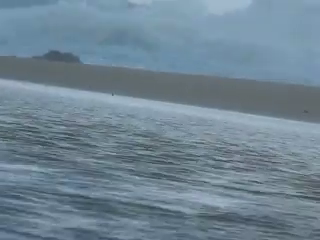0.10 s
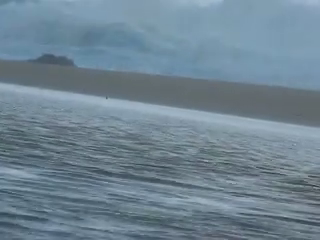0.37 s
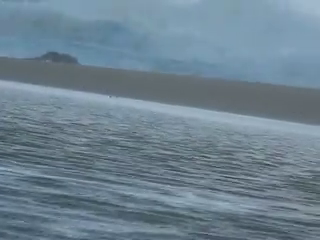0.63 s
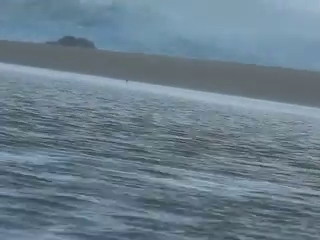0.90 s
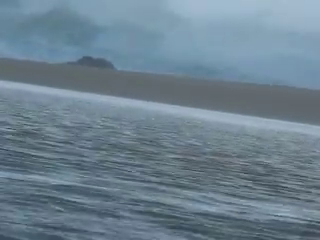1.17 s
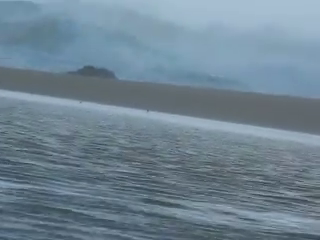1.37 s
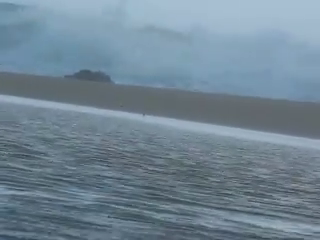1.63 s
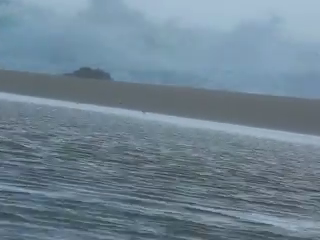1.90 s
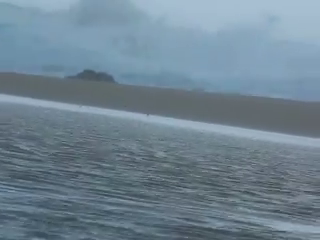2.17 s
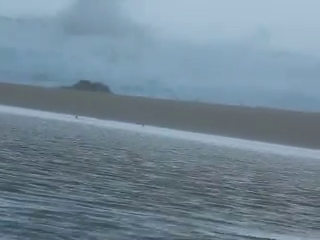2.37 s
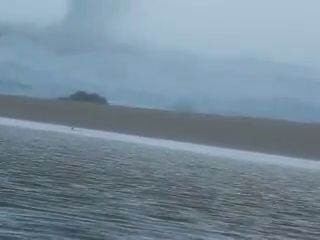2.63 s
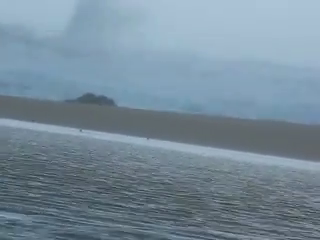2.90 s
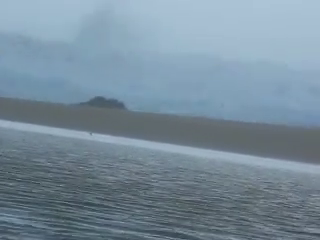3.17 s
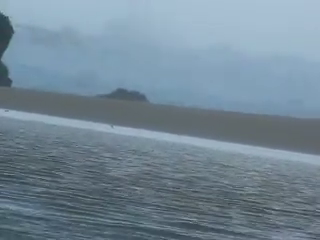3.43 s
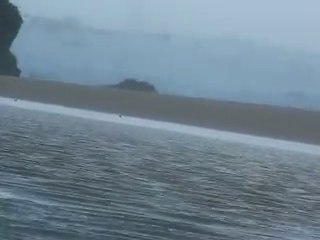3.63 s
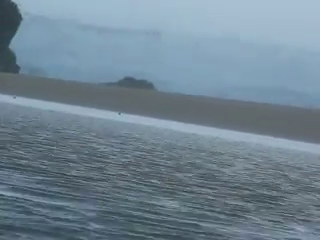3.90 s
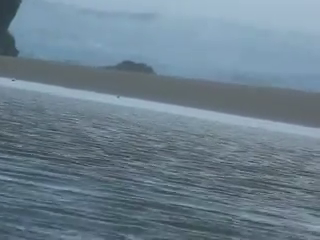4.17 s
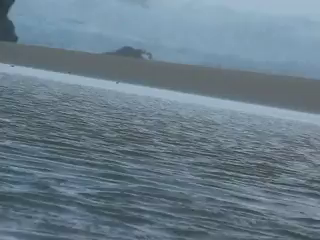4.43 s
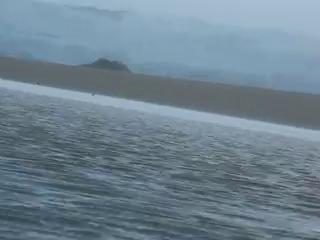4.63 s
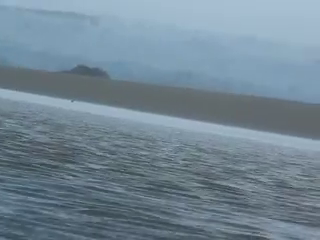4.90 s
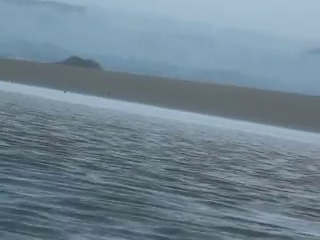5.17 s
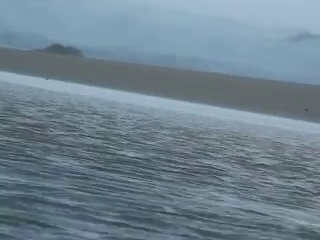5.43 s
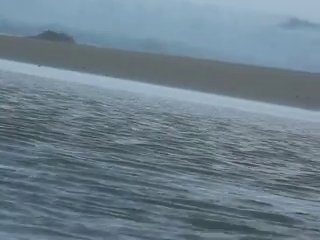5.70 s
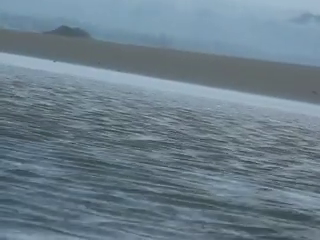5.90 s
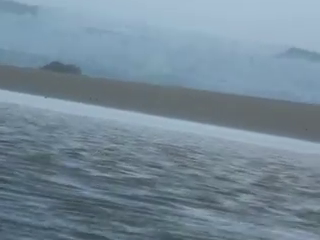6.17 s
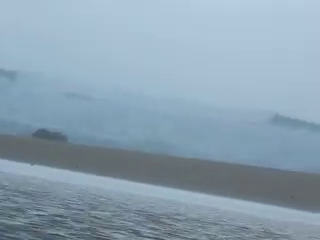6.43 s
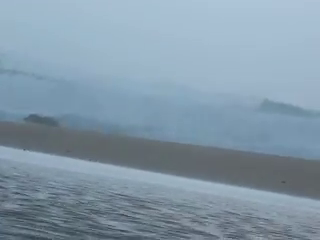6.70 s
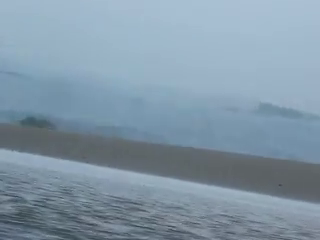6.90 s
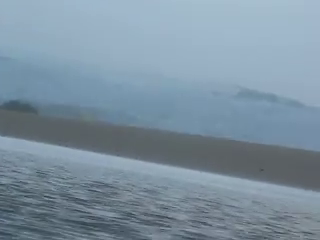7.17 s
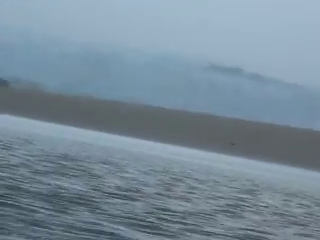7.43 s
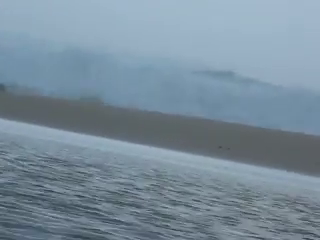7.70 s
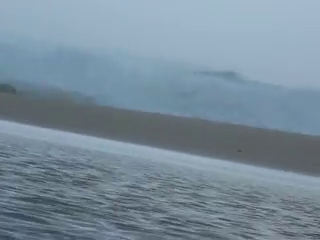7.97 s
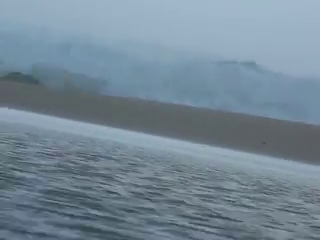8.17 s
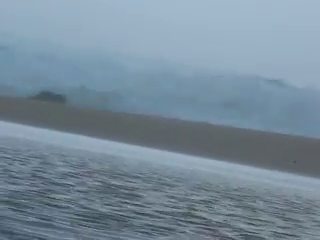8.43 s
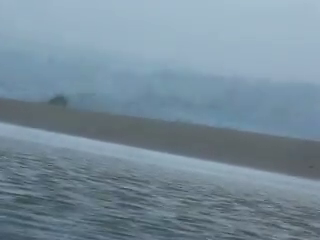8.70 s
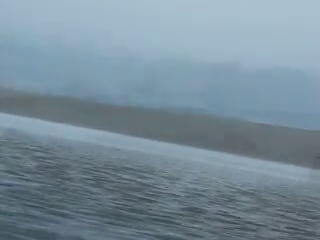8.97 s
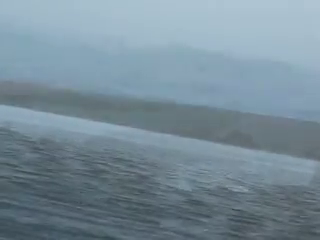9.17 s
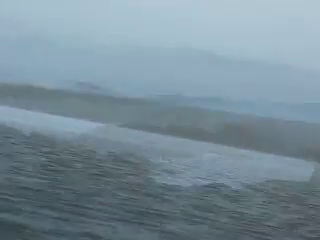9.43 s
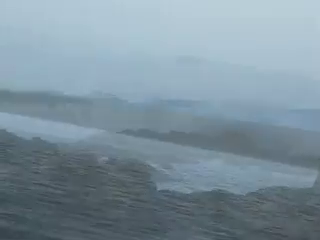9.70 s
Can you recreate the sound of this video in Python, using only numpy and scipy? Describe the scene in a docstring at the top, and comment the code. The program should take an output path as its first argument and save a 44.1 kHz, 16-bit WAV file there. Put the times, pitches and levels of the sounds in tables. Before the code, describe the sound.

On an exposed stormy shore, heavy surf roars continuously some way off, a wide blurred wash of low roar and soft hiss without distinct breaking waves. Close up, wind tears across a stereo microphone in deep, ragged thumps with duller fluttering flaps on top, the two sides moving independently. Hard hits on the left come at 0.6-0.7 s, then the right takes several between 0.8 and 1.6 s. From about 2 s the left is battered almost constantly, with especially violent, clipped blows near 2.7, 3.1, 4.2, 4.9, 6.4 and 7.1 s; the whole sound dips briefly after the worst. Short lulls around 7.4 and 8 s let the surf through more clearly, its hiss strongest near 8.2 s. Another thud lands there, with lesser buffets until 9 s. The left then eases, leaving lighter rumble, a small flap on the right at 9.3 s, and continuing surf to the end at 9.8 s.

```python
"""Storm surf and wind on two microphone ports

Heavy surf roars some way off on an open coast: banded noise, shaded and delayed by a slowly turning housing;
its level as heard creeps up and falls back after hard buffets, along a set curve.
Close by, gusts tear across the ports: low noise thumps on each port on its own, the left mostly the harder hit,
with brighter flaps on top. A limiter briefly pulls the whole sound down after the hardest buffets,
and peaks that still exceed full scale are clipped."""
import sys
import numpy as np
from scipy import signal
from scipy.fft import rfft, irfft, next_fast_len
from scipy.io import wavfile
from scipy.ndimage import uniform_filter1d

SR = 44100
rng = np.random.default_rng(int(sys.argv[2]) if len(sys.argv) > 2 else 0)


def waveform_to_disk(signal):
    """Save audio, clipped to [-1, 1], as 16-bit WAV at the path in sys.argv[1]."""
    frames = np.transpose(np.atleast_2d(signal))
    scaled = np.clip(frames, -1, 1) * 32767
    samples = np.round(scaled).astype(np.int16)
    wavfile.write(sys.argv[1], SR, samples)


def gain_from_db(level_db):
    """Convert decibel levels to linear amplitude factors (20 dB per decade)."""
    decades = np.asarray(level_db, float) / 20
    return 10 ** decades


N = 433503

# slow turn of the microphone housing: (time [s], share of the turn [0-1])
TURN = [(0, 0.12), (1.5, 0.1), (3.5, 0.54), (6.5, 0.86), (9.83, 1)]


def rms_one(x):
    """Scale each channel to rms 1."""
    return x / np.sqrt(np.mean(x ** 2, axis=-1, keepdims=True) + 1e-20)


def in_time(rows):
    """Columns of a curve table, one value a sample."""
    seconds, *columns = np.transpose(rows)
    return np.array([np.interp(np.arange(N) / SR, seconds, column) for column in columns])


def at_hz(points, hz):
    """Read a spectrum on a log-frequency axis."""
    point_hz, value = np.transpose(points)
    return np.interp(np.log(hz + 1e-3), np.log(point_hz), value)


def coloured(x, gain_db_at):
    """Filter by a smooth gain given in dB as a function of frequency."""
    size = next_fast_len(N)
    hz = np.arange(size // 2 + 1) * SR / size
    return irfft(rfft(x, size) * gain_from_db(gain_db_at(hz)), size)[..., :N]


def drift(corner_hz, channels=1):
    """Slow chance of spread 1: coarse noise through a double one-pole low-pass."""
    step, settle = 40, 2000   # samples between coarse points, coarse points dropped at the start
    pole = np.exp(-2 * np.pi * corner_hz * step / SR)
    coarse = rng.standard_normal((channels, N // step + settle + 2))
    slow = rms_one(signal.lfilter([1], [1, -2 * pole, pole * pole], coarse)[:, settle:])
    return np.array([np.interp(np.arange(N) / step, np.arange(len(row)), row) for row in slow])


def housing(x):
    """The housing shades and delays the ports by frequency; its states before and after the turn crossfade."""
    # (frequency [Hz], left minus right [dB], right lag [rad],
    #  then once turned: added left gain [dB], added right gain [dB], right lag [rad]);
    # lags shrink below the first frequency
    shading = np.array([(1380, 1, -0.34, -2, -2.5, 0.38), (2170, -3, 0, 4.5, 4, 0.38),
                        (3540, -1.5, 0.28, 2, -0.5, 1.54), (4560, 0.5, -0.38, 0, -2.5, 1.34),
                        (5450, -1, -0.72, -0.5, -2.5, 1.3), (6660, -5.5, 0.37, 2, -1, 2.53),
                        (8500, -1, 1.2, 2.5, -0.5, 2.14), (10100, 13.5, 1.2, 0, 0, 3.8)])
    size = next_fast_len(N)
    hz = np.arange(size // 2 + 1) * SR / size
    lean_db, lag, left_db, right_db, turned_lag = [at_hz(shading[:, [0, k]], hz) for k in range(1, 6)]
    # long waves reach both ports together
    short_waves = np.clip(hz / shading[0, 0], 0, 1) ** 2
    lag, turned_lag = lag * short_waves, turned_lag * short_waves
    sides = np.array([[0.5], [-0.5]])   # half of each difference goes to each port
    leaned = rfft(x, size) * gain_from_db(lean_db * sides)
    before = irfft(leaned * np.exp(1j * lag * sides), size)[:, :N]
    turned = leaned * gain_from_db(np.array([left_db, right_db]))
    after = irfft(turned * np.exp(1j * turned_lag * sides), size)[:, :N]
    turn = np.clip(in_time(TURN), 0, 1)
    return (1 - turn) * before + turn * after


def surf(together_db=0.5, own_db=0.22, body_per_turn_db=2):
    """Countless distant bubbles blur into noise; each band swells a little on its own and a little with all."""
    # surf level as heard, 2-8 kHz: creeps up, falls back after hard buffets: (time [s], level [dB])
    heard_level = [(0.0, -26), (0.02, -33.5), (0.55, -28.5), (0.74, -34), (1.56, -34.5), (1.64, -37),
                   (2.25, -36.5), (2.74, -40.5), (2.98, -37.5), (3.59, -38.5), (3.97, -35.5), (5.04, -39),
                   (5.58, -32), (5.67, -35.5), (6.27, -36.5), (6.46, -40), (7.77, -32), (7.8, -35),
                   (8.21, -30.5), (8.27, -33.5), (9.17, -38.5), (9.42, -35), (9.64, -40), (9.83, -38.5)]
    # colour of the surf ahead of the housing: (frequency [Hz], relative level per Hz [dB])
    surf_colour = [(40, -9), (110, -3.5), (210, -3), (350, -16), (496, -8.5), (761, -16.5), (944, -15),
                   (1500, -21), (2140, -29), (4330, -27.5), (7620, -34.5), (9630, -44.5), (10600, -60.5),
                   (11500, -89)]
    # likeness of the surf at the two ports, ahead of the housing: (frequency [Hz], correlation)
    likeness = [(100, 1), (640, 0.98), (1410, 0.91), (2100, 0.85), (3110, 0.32), (4620, 0.61), (6850, 0.35),
                (10200, 0.11)]

    heard_db = in_time(heard_level)[0]
    # the roar's body grows against the hiss as the housing turns
    body_db = body_per_turn_db * in_time(TURN)[0]
    # two noise pairs, so that neighbouring bands are unrelated
    noise_pairs = coloured(rng.standard_normal((2, 2, N)), lambda hz: at_hz(surf_colour, hz))
    together = drift(6.0)
    edges = 40 * 2 ** np.arange(0.5, 8.6, 0.5)   # half octaves [Hz]
    roar = 0
    for k, (low, high) in enumerate(zip(edges, edges[1:])):
        band = signal.butter(2, [low, high], "band", fs=SR, output="sos")
        mid, side = signal.sosfilt(band, noise_pairs[k % 2])
        centre_hz = np.sqrt(low * high)
        alike = np.clip(at_hz(likeness, centre_hz), -1, 1)
        # body changes act almost fully up to 1.2 kHz and fade out towards the hiss
        body_share = at_hz([(1200, 0.97), (2600, 0)], centre_hz)
        swell_db = together_db * together + own_db * drift(6.7)
        gain = gain_from_db(body_share * (body_db - body_db.mean()) + swell_db)
        roar = roar + gain * (np.sqrt(1 + alike) * mid + np.sqrt(1 - alike) * side * [[1], [-1]])
    roar = housing(roar)
    hiss_band = signal.butter(4, [2000, 8000], "band", fs=SR, output="sos")
    hiss = signal.sosfilt(hiss_band, roar.mean(axis=0))
    return gain_from_db(heard_db) * roar / np.sqrt(np.mean(hiss ** 2))


def eddy_strength(lumps_db=3.0, steady_flap_db=-17.5, flutter_db=4.5, flap_tightness=0.98):
    """Thump and flap strength per port: a lumpy steady rush plus one bell-shaped bump for each buffet."""
    # steady rush of air over the ports, ahead of its lumps: (time [s], left level [dB], right level [dB])
    rush = [(0.0, -13.5, -31), (0.3, -24, -29), (0.7, -14, -19), (1.0, -20.5, -14.5), (1.55, -16, -19),
            (1.75, -21.5, -33), (2.25, -14.5, -23), (2.75, -19.5, -27.5), (3.05, -16.5, -21.5),
            (3.25, -17, -29), (3.55, -13, -21), (3.8, -18.5, -26.5), (4.05, -16.5, -22), (4.9, -17.5, -32),
            (5.25, -23.5, -28), (5.7, -15, -26), (6.4, -15, -37), (6.6, -21, -36), (7.05, -15.5, -26),
            (7.3, -34, -38), (7.62, -15, -25), (8.1, -23, -36), (8.8, -13.5, -25.5), (9.2, -26.5, -23),
            (9.6, -20.5, -21.5), (9.83, -25.5, -17.5)]
    # hardest single eddies: (time [s], left level [dB], right level [dB],
    #  length between the -4 dB points [ms], flap against the thump [dB])
    buffets = [(0.019, -7.5, -23, 17, -30), (0.628, -5.5, -17, 10, -8), (0.695, -4.5, -21.5, 23, -21),
               (0.782, -9, -8.5, 43, -17), (0.899, -11, -13, 20, -9), (1.15, -13, -8, 16, -5.5),
               (1.397, -23, -10, 15, -14), (1.469, -15.5, -10, 31, -11.5), (1.586, -17, -1.5, 13, -17),
               (1.628, -5, -27, 23, -13.5), (1.947, -10, -18.5, 84, -13.5), (2.19, -11, -14, 45, -12),
               (2.35, -5.5, -16, 49, -14), (2.575, -11.5, -22, 35, -12.5), (2.655, -2, -18, 13.7, -9),
               (2.911, -9, -23, 17, -18), (3.112, -1, -17, 16.6, -7.5), (3.407, -11, -19.5, 43, -8.5),
               (3.741, -8.5, -13.5, 25, -7), (3.993, -8, -16, 31, -16), (4.123, -9, -25.5, 17, -14),
               (4.195, -3.5, -10, 12, -16.5), (4.408, -9, -19.5, 39, -10.5), (4.512, -8.5, -29, 8.5, -12.5),
               (4.788, -9.5, -28, 22, -12), (4.937, -1.5, -27, 13, -16.5), (4.991, -7, -30, 20, -22),
               (5.196, -12, -21, 28, -13), (5.662, -7, -20, 24, -16), (5.881, -6.5, -21, 13, -18),
               (6.024, -8, -22, 20, -13), (6.322, -4.5, -24, 29, -12), (6.462, -3, -21, 28, -11),
               (6.778, -7, -25, 12, -16), (6.926, -8, -22, 17, -4.5), (7.093, -3.5, -27, 10, -10),
               (7.255, -10, -32, 15, -4), (7.78, -9, -22, 47, -17), (8.233, -5, -20, 21, -15),
               (8.585, -6.5, -21, 12, -33), (8.893, -8, -22, 12, -18), (9.02, -11, -17, 20, -17),
               (9.341, -28, -19, 15, -2)]

    power = gain_from_db(2 * (in_time(rush) + lumps_db * drift(15.6, channels=2)))
    # the rush flaps too, in lumps of its own
    flap_power = power * gain_from_db(2 * (steady_flap_db + flutter_db * drift(15.0, channels=2)))
    for seconds, left_db, right_db, length_ms, flap_db in buffets:
        centre = seconds * SR
        spread = length_ms * SR / 1000 / 2.7
        span = np.arange(max(int(centre - 4 * spread), 0), min(int(centre + 4 * spread), N))
        peak = gain_from_db(2 * np.array([[left_db], [right_db]]))
        away = ((span - centre) / spread) ** 2
        # the thump stands out of the rush, the flap adds to it; tightness below 1 makes the flap longer
        power[:, span] = np.maximum(power[:, span], peak * np.exp(-0.5 * away))
        flap_power[:, span] += peak * gain_from_db(2 * flap_db) * np.exp(-0.5 * away * flap_tightness ** 2)
    return np.sqrt(power), np.sqrt(flap_power)


def wind(evenness=0.55):
    """Low eddy pressure, unrelated at the two ports, with a brighter flap on top."""
    # colour of eddy pressure on a port: (frequency [Hz], relative level per Hz [dB])
    eddy_colour = [(12, -26), (22, -7), (59, 2), (151, -2), (230, -7), (340, -16.5), (550, -38.5),
                   (1500, -54), (4000, -77)]
    strength, flap_strength = eddy_strength()
    thump = rms_one(coloured(rng.standard_normal((2, N)), lambda hz: at_hz(eddy_colour, hz)))
    # the eddy strength sets the loudness, so the noise's own swells are partly evened out
    swell = uniform_filter1d(uniform_filter1d(thump ** 2, size=600), size=600)
    thump = rms_one(thump / (swell + 0.05) ** (evenness / 2))
    flap_band = signal.butter(1, [220.0, 420.0], "band", fs=SR, output="sos")
    dull_noise = signal.lfilter([0.06], [1, -0.94], rng.standard_normal((2, N)))
    flap = rms_one(signal.sosfilt(flap_band, dull_noise))
    return strength * thump + flap_strength * flap


def scene():
    """Distant surf and close wind add at the ports."""
    return surf() + wind()


def top_cut(x):
    """Nothing passes above the cut-off."""
    return signal.sosfilt(signal.butter(12, 10770, fs=SR, output="sos"), x)


def record(dry, knee_db=-2.0, share=0.39, release_db_per_s=27.0):
    """A linked limiter ducks both channels after peaks, then the converter clips at full scale."""
    peak_db = 20 * np.log10(np.abs(dry).max(axis=0) + 1e-9)
    over_db = np.maximum(peak_db - knee_db, 0)
    # hold each peak's ducking while it falls at the release rate
    ramp = release_db_per_s * np.arange(N) / SR
    held_db = np.maximum.accumulate(share * over_db + ramp) - ramp
    attack = np.exp(-1 / (0.0018 * SR))   # 1.8 ms time constant
    ducking_db = signal.lfilter([1 - attack], [1, -attack], held_db)
    mix = np.clip(dry * gain_from_db(-ducking_db), -1, 1)
    return top_cut(mix)


dry = scene()
out = record(dry)
waveform_to_disk(out)
```